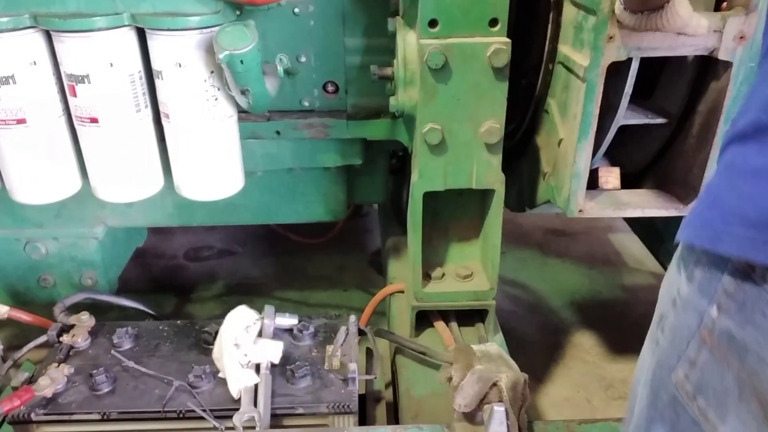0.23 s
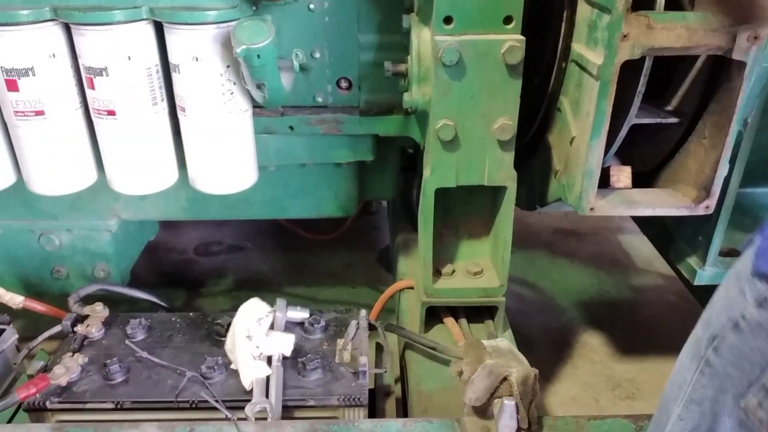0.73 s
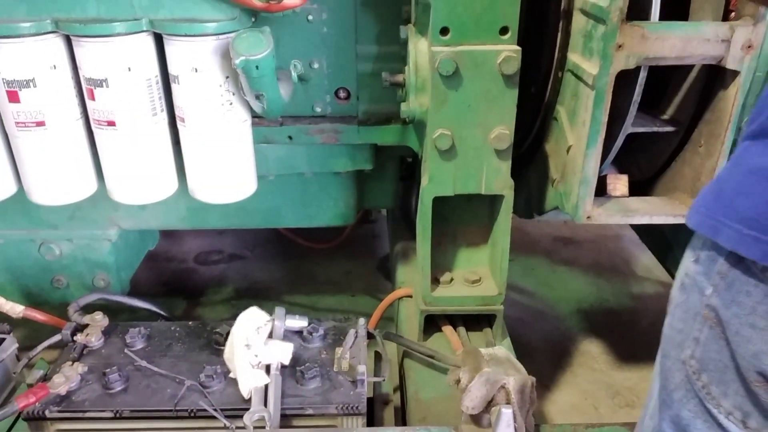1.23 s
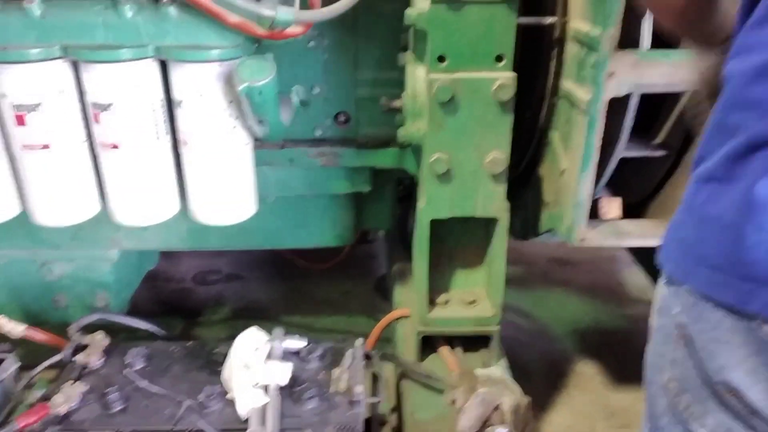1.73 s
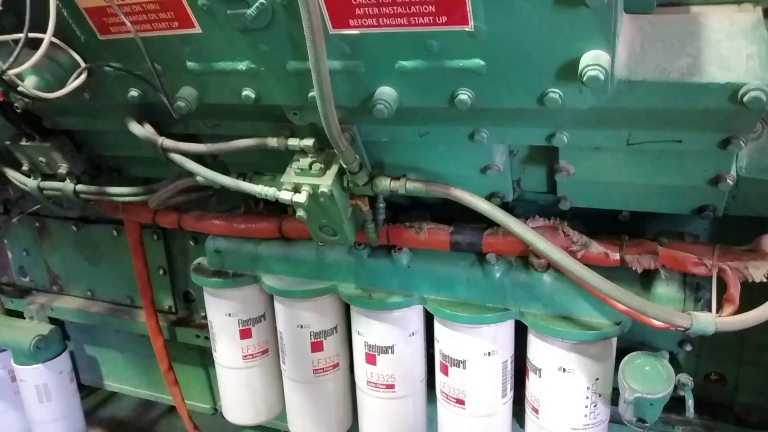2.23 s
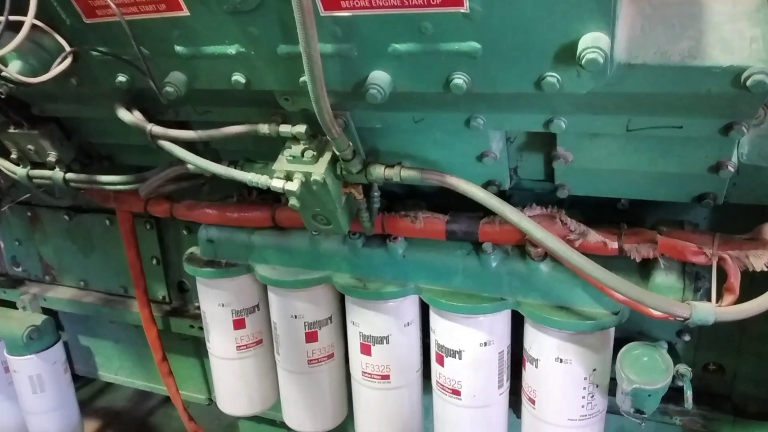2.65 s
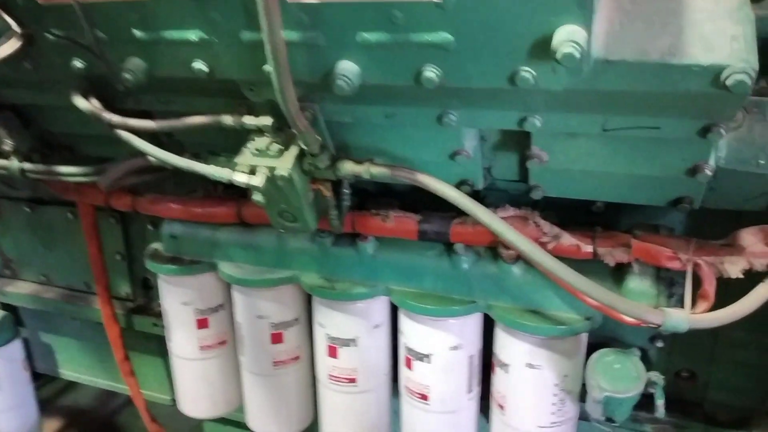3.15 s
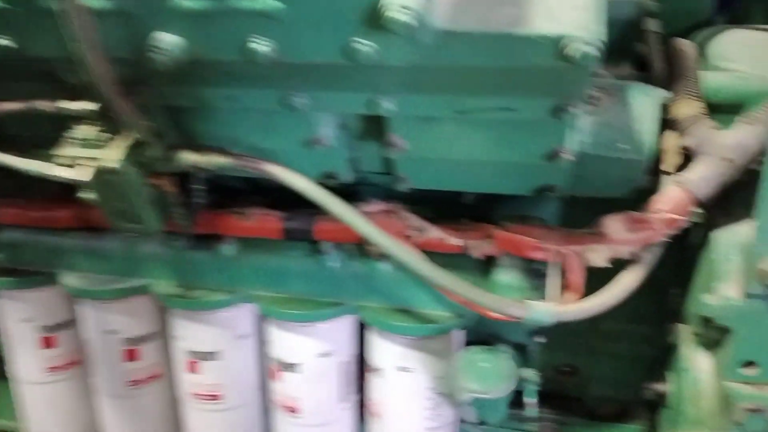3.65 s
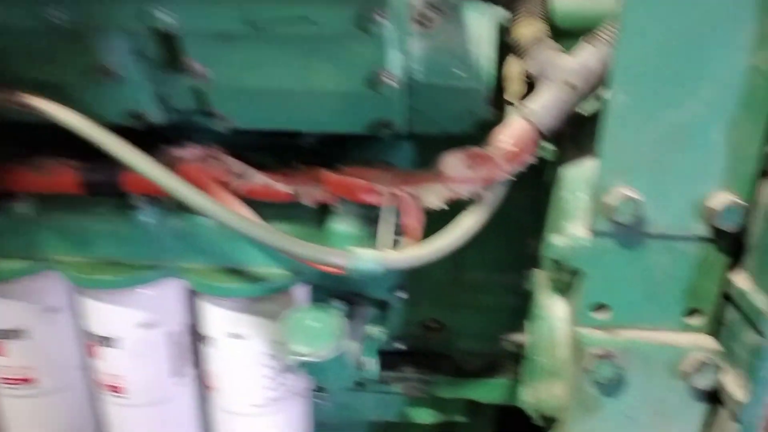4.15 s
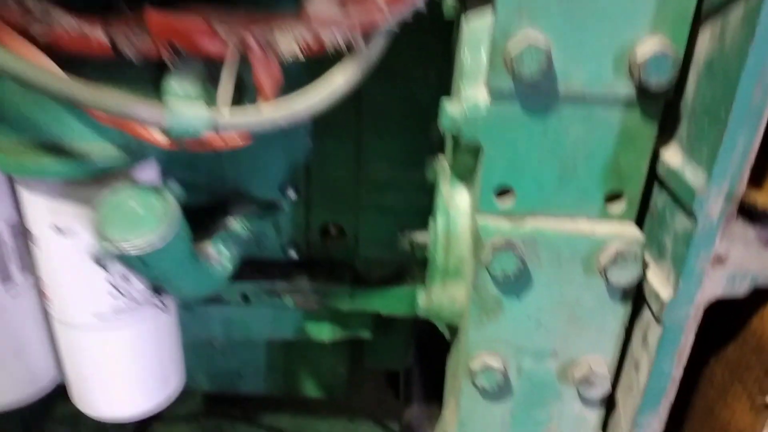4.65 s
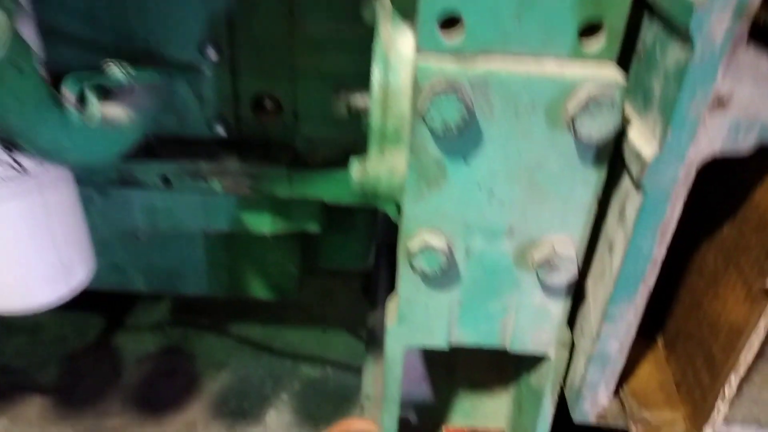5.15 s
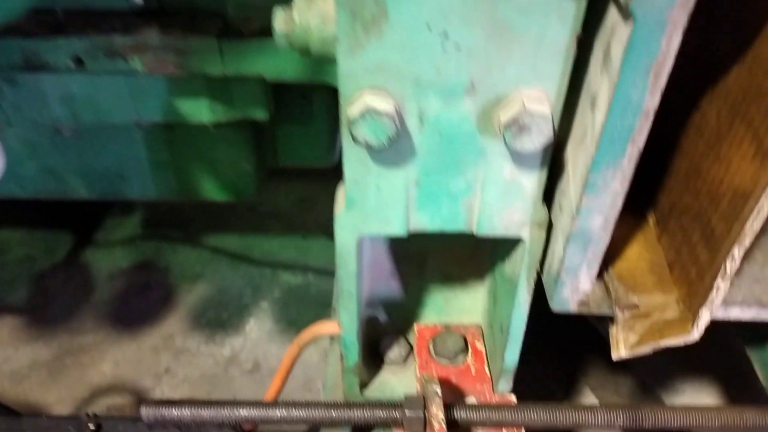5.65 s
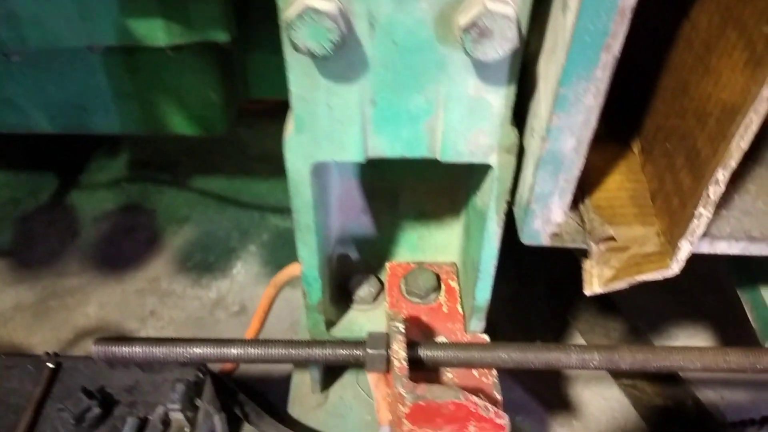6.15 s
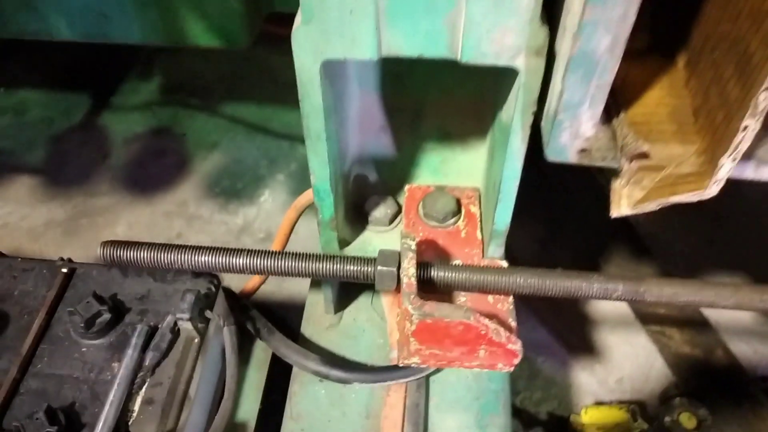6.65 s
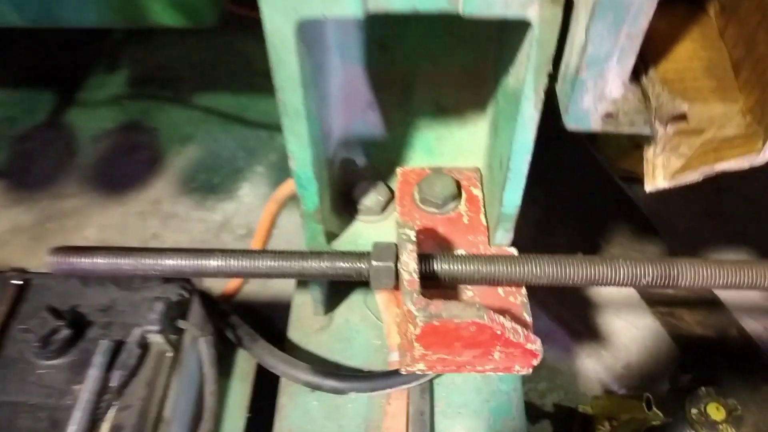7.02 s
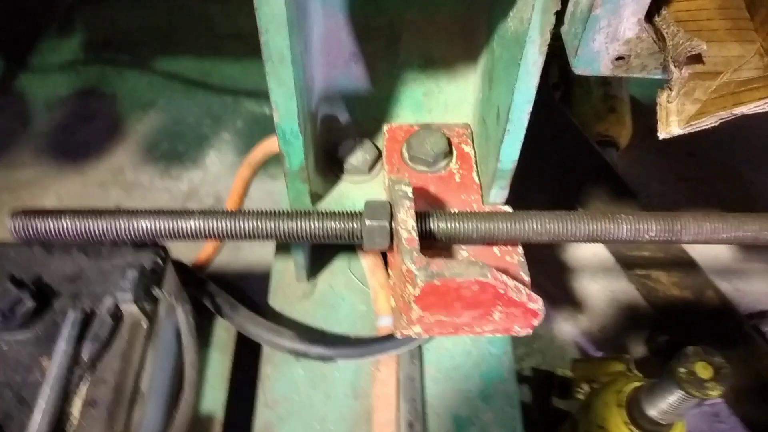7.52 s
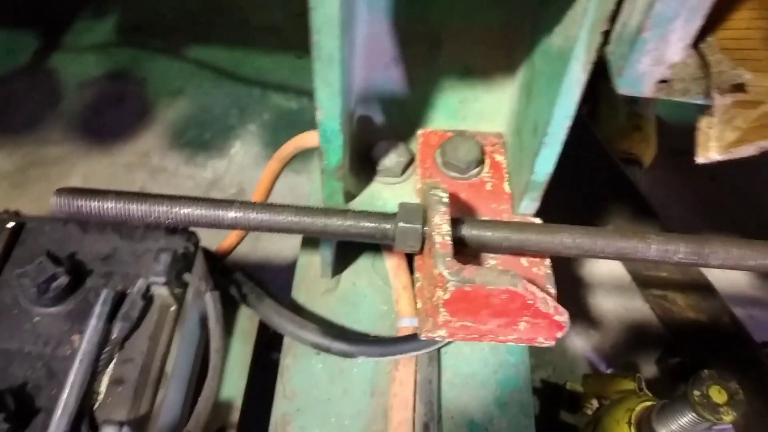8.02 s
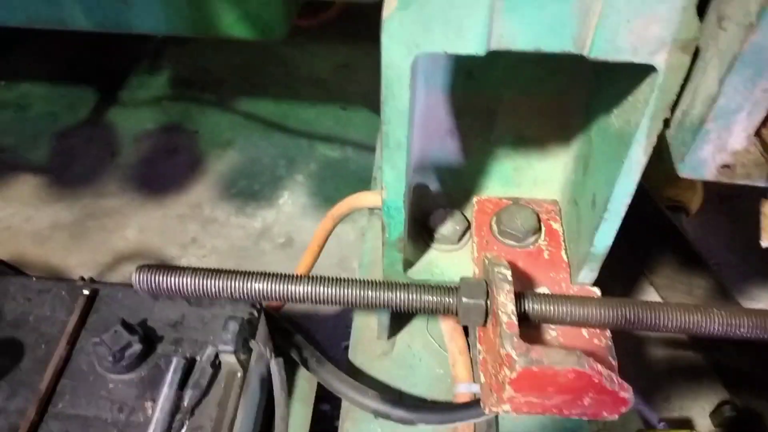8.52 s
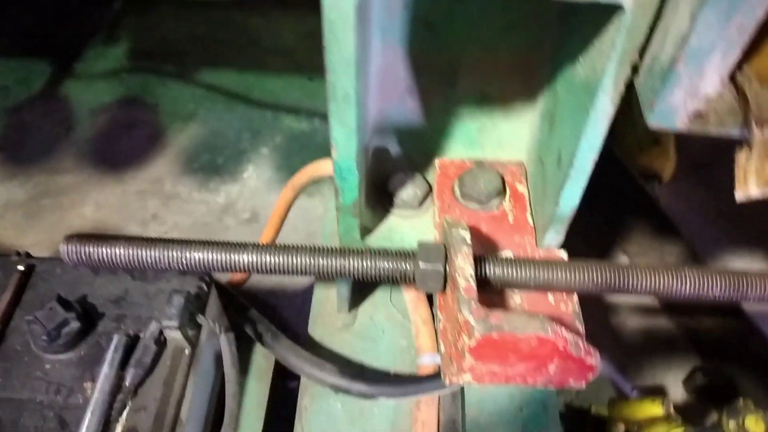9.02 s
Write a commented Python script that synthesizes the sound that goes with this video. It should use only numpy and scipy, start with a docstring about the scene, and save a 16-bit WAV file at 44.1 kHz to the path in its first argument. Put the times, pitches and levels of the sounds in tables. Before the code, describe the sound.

Loud, constant diesel engine clatter with drone, thin turbo whistle and air rush, interrupted once by about a third of a second of silence.

```python
"""A sixteen-cylinder diesel generator knocks at 1500 rpm in a hard plant room, heard by a phone carried along it.
Impulses at fixed crank angles, convolved with decaying noise, are the knocks and their reverberation.
Crank-locked sines are the drone and gear whine, a wandering sine and octave the turbocharger's whistle.
Decaying sines are the throbbing firings, rattles, short rings and clinks; shaped noise is the rush of air.
The phone's input is overloaded; once the sound stops, stays silent and fades back in."""
import sys
import numpy as np
from scipy import signal
from scipy.fft import rfft, irfft, next_fast_len
from scipy.io import wavfile
from scipy.ndimage import uniform_filter1d

SR = 44100
rng = np.random.default_rng(int(sys.argv[2]) if len(sys.argv) > 2 else 0)


def transcribe(signal):
    """Save signal, clipped to [-1, 1], as a 16-bit WAV file at the path in sys.argv[1]."""
    frames = np.atleast_2d(signal).T
    limited = np.clip(frames, -1, 1)
    pcm = np.round(limited * 32767).astype(np.int16)
    wavfile.write(sys.argv[1], SR, pcm)


N = 409248
TIME = np.arange(N) / SR  # s

# All source levels are stated ahead of the phone's input gain.
CYCLE_HZ = 12.498  # engine cycles per second, two crank turns each
FIRINGS_PER_CYCLE, FAN_MULTIPLE, GEAR_MULTIPLE = 16, 30, 260  # multiples of the engine cycle
# Relative spectrum of the knocks: [f/Hz, spectral level/dB]
KNOCK_SPECTRUM = [(20, -41), (45, -26.5), (65, -12.5), (90, -8.5), (130, -5), (190, 0.5), (300, -12),
                  (500, -14), (800, -12.5), (1150, -17), (1700, -13), (2800, -23.5), (5000, -28),
                  (12000, -28.5)]
ROOM_T60_S = 0.43
# Resonances and hollows of the engine covers: [f/Hz, width/Hz, gain/dB]
CASING_MODES = [(1490, 51, 2.5), (1920, 120, 1), (2060, 100, -2.5), (2210, 210, 0.5), (3250, 260, 1.5),
                (3920, 390, -1.3), (4260, 250, 1)]
# Low room resonances excited by uneven firings: [t/s, length/s, f/Hz, level/dB]
THROBS = [(4.3, 0.39, 140, -19), (5.1, 0.52, 143, -21), (5.877, 0.19, 168, -13.5), (5.3, .6, 245, -21.5),
          (6.95, 0.36, 215, -17), (8.15, 0.29, 154, -19), (3.2, .7, 265, -22.5)]
THROB_T60_S, THROB_SCATTER_DB = .06, 7

# Crank-locked tones (16 firing, 30 fan, 37 casing, 55 gears, the rest the block):
# [multiple of the engine cycle, level beside the filters/dB, level by the fan end/dB]
CRANK_TONES = [(6, -30, -29), (8, -29, -30), (9, -35, -22), (11, -32, -24), (13, -31, -30), (14, -36, -30),
               (16, -29.5, -25.5), (18, -36, -26), (22, -30, -25.5), (27, -37, -33), (28, -36, -31),
               (30, -18, -17.5), (33, -29, -35), (37, -28, -31), (44, -33, -34), (55, -33, -34),
               (56, -39, -38), (63, -33, -34), (64, -38, -34), (74, -35, -37), (120, -37, -35),
               (136, -40, -45), (150, -39, -39)]
# Standing waves crossed on the walk: [t/s, length/s, multiple of the engine cycle, gain at the centre/dB]
STANDING_WAVES = [(.35, .9, 16, 7), (1.5, .6, 16, 8), (6.7, .35, 16, 7), (.8, 2, 30, -2.5),
                  (4.2, .1, 30, -3), (4.85, .5, 30, -10), (1.1, 1.2, 37, -7), (3.25, .4, 37, 5.5),
                  (3.9, .3, 37, 9), (6.7, .6, 37, 4), (.6, .5, 44, 3), (3.5, .55, 44, 8.5),
                  (5.7, .4, 44, 7.5), (7.3, .6, 44, -7), (0, .3, 55, 8), (.9, .4, 55, 11),
                  (1.6, .7, 55, 12), (5.6, .5, 55, 8.5), (.9, 1.6, 56, 8), (.9, 1.8, 63, 5),
                  (5, 1.8, 63, -8), (2.7, .6, 16, -5), (1.2, 1.3, 6, 5), (6.9, .8, 6, 6),
                  (4.9, .35, 74, 8.5), (8.5, .7, 14, 6)]
FAN_WAVER, ENGINE_WAVER = 0.074, 0.21  # basic unsteadiness (0-1), greater where a tone sinks
# Gear whine beside the block: [t/s, length/s, level/dB]
GEAR_SWELLS = [(1.08, .36, -31.5), (1.68, .2, -33.5)]

# Blade rate of the turbocharger: [t/s, f/Hz]
BLADE_RATE = [(0, 4993), (1.5, 5000), (1.9, 4990), (2.5, 4940), (3.5, 4951), (6.2, 4949), (9.28, 4928)]
# Rise and fall of the whistle's fundamental along the walk: [t/s, length/s, gain at the centre/dB]
WHISTLE_SWELLS = [(.37, .12, 9), (1.797, 0.33, -4), (2.622, 0.17, 5), (3.15, .17, 6), (5.05, .4, 2.5),
                  (5.85, 0.16, -7), (6.65, 0.12, 9), (7.1, .3, -1), (8.05, .15, 1), (8.65, 0.36, -13)]
WHISTLE_DB = -32.5  # the same beside the filters and by the fan end
WHISTLE_OPENING_DB, WHISTLE_SETTLE_S = 8.5, .35  # initial excess and its time constant
WHISTLE_FADE_DB = 2.2  # depth of the irregular fading of the fundamental

# Rattling covers and pipes:
# [f/Hz, T60/s, level of a typical tap/dB, crank angle/cycles, t of passing/s, length of the pass/s]
RATTLING_PARTS = [(940, 0.076, -29, .3, 5, .5), (1497, 0.05, -20.5, .78, 8.3, 1.6),
                  (1044, 0.026, -27.5, 0.52, 7.4, 1.4), (1415, .035, -26.5, .28, .8, 1.3),
                  (1750, .04, -28, .54, .9, 1.3), (1886, 0.092, -25.5, .45, 4.5, .5),
                  (2110, 0.076, -25, 0.54, 7.1, 1.1), (2270, .045, -26, .1, 6.9, 0.65)]
RATTLE_SLACK, RATTLE_DETUNE = 0.0252, .018  # scatter of the moment (cycles) and of the note (share)
RATTLE_PASS_DB = 10.5  # rise as the phone passes a part
TAP_ATTACK_S = 0.0021
RINGS_PER_S, RING_DB, RING_T60_S = 70, -25.5, .04  # random short rings
RING_LOW_HZ, RING_HIGH_HZ = 1153, 2470  # range of notes
# Single louder clinks of loose metal: [t/s, f/Hz, level/dB]
CLINKS = [(1.515, 2370, -12), (1.672, 2020, -11), (7.675, 2070, -17), (7.720, 2080, -14),
          (7.818, 1970, -15), (8.383, 1450, -16), (8.556, 1880, -13)]
CLINK_T60_S = .09

# Relative spectrum of the air rush: [f/Hz, spectral level/dB]
RUSH_SPECTRUM = [(12, -20), (44, -9), (62, -4), (79, 7), (102, 0), (170, 0), (230, -5), (330, -7),
                 (500, -11), (800, -11), (1200, -15), (2100, -14), (3000, -21), (11000, -23),
                 (15000, -24.5)]
# Swells of air noise along the walk: [t/s, length/s, centre f/Hz, width/Hz, level/dB]
AIR_SWELLS = [(1.2, .5, 3260, 300, -31.5), (0.99, 1.3, 7850, 900, -28.5), (2.64, .14, 4000, 13600, -15),
              (2.4, .13, 2300, 900, -23), (7.62, .3, 6950, 894, -23.5), (8.3, 0.41, 7300, 700, -26.5),
              (.1, 0.46, 4400, 350, -28.5), (2.9, .8, 330, 120, -23)]

# Place of the phone: [t/s, nearness to the fan end (0-1)]
PHONE_PLACE = [(0, .55), (1.5, 0.53), (2.9, 0.3), (3.7, 0.25), (4.4, 0.58), (5.9, 0.95), (9.28, 0.93)]
# Upper edges of boom, body, clatter and hiss: [f/Hz]
BAND_EDGES_HZ = [240, 600, 3000, 22050]
# Boom, body, clatter and hiss: [level beside the filters/dB, level by the fan end/dB]
BAND_LEVELS = [(-16.5, -12.5), (-17.5, -17), (-13.5, -14.5), (-16, -16.5)]
PORT_GAP_M = 0.14
# Response of the left microphone port: [f/Hz, gain/dB]
LEFT_PORT = [(2500, -3.5), (3700, 0.5), (4400, 1.5), (6200, -1.5), (7800, 5.5), (9200, -2), (11000, -4.5),
             (12000, -3.5), (14000, -8), (15000, -11.5)]
# Response of the right microphone port: [f/Hz, gain/dB]
RIGHT_PORT = [(2500, -3.5), (3700, -1), (4400, -0.5), (6200, -3), (7800, -3.5), (9200, 1), (10700, 2.5),
              (12000, -1), (14000, -9), (15000, -7.5)]
# The sound stops, stays silent and fades back in: [t/s, gain (0-1)]
SILENCE_AND_RETURN = [(1.879, 1), (1.881, .05), (1.905, 0), (2.222, 0), (2.224, .08), (2.44, 1)]
TOP_HZ = 15250  # upper limit of the phone's sound


def knock_train(crank, count=64, scatter_db=4.0):
    """Periodic excitation: strokes recur at their own crank angles, slightly varied in strength each cycle."""
    angle = (np.arange(count) + rng.random(count)) / count
    sign = rng.choice([-1, 1], count)
    strength = sign * undb(3.6 * rng.standard_normal(count))
    cycles = np.arange(int(crank[-1]) + 1)[:, None]
    at = np.interp(cycles + angle, crank, np.arange(N), right=0).ravel()
    variation = undb(scatter_db * rng.standard_normal((len(cycles), count)))
    size = (strength * variation).ravel() * (at > 0)
    # Each impulse is shared between its two neighbouring samples.
    i, part = at.astype(int), at % 1
    early = np.bincount(i, size * (1 - part), N + 1)
    late = np.bincount(i + 1, size * part, N + 1)
    return (early + late)[:N]


def clatter(crank, count=22):
    """Reverberation: knocks convolve with decaying echoes, differing by place and blended along the walk."""
    t = TIME[:SR // 2]
    lead = int(round(SR * int(CYCLE_HZ / 2) / CYCLE_HZ))  # the room is already ringing at the start
    out = np.zeros((2, N))
    for k in range(count):
        knocks = knock_train(crank)
        running = np.r_[knocks[:lead], knocks]
        away = TIME / TIME[-1] * (count - 1) - k
        near = np.flatnonzero(abs(away) < 1)
        echoes = rng.standard_normal((2, len(t))) * decay(t, ROOM_T60_S)
        excitation = running[None, near[0]:near[-1] + lead + 1]
        heard = signal.fftconvolve(excitation, echoes, axes=1)
        out[:, near] += unit(heard[:, lead:lead + len(near)]) * np.cos(np.pi / 2 * away[near])
    return unit(colour(diffuse(out), KNOCK_SPECTRUM))


def casing(x):
    """Structural resonance: the covers favour some frequencies and swallow others."""
    def gain(hz):
        return undb(sum(db * np.exp(-2 * ((hz - centre) / width) ** 2) for centre, width, db in CASING_MODES))
    return filtered(x, gain)


def along_walk(x):
    """Distance balance: towards the fan end the boom grows while clatter and hiss recede."""
    out = 0
    for edge, (side_db, end_db) in zip(BAND_EDGES_HZ, BAND_LEVELS):
        band = filtered(x, lambda hz: 1 / (1 + (hz / edge) ** 8))
        x = x - band  # the remainder goes to the higher bands
        out = out + unit(band) * undb(by_place(side_db, end_db))
    return out


def throb(crank):
    """Modal excitation: uneven firings thump low room resonances, which swell as the phone passes."""
    at = np.flatnonzero(np.diff(np.floor(FIRINGS_PER_CYCLE * crank)))
    t = TIME[:SR // 4]
    out = 0
    for s, length, hz, db in THROBS:
        strength = undb(THROB_SCATTER_DB * np.minimum(rng.standard_normal(len(at)), 2))
        firings = np.bincount(at, strength - strength.mean(), N)  # only the unevenness excites the room
        mode = np.sin(2 * np.pi * hz * t) * decay(t, THROB_T60_S)
        boom = signal.fftconvolve(firings, mode)[:N]
        out = out + unit(boom) * undb(db) * swell(s, length)
    return out


def drone(crank):
    """Harmonic radiation: crank multiples swell, or sink and waver more, as the phone crosses standing waves."""
    out = 0
    for multiple, side_db, end_db in CRANK_TONES:
        waves_db = sum(db * swell(s, length) for s, length, which, db in STANDING_WAVES if which == multiple)
        waver = FAN_WAVER if multiple == FAN_MULTIPLE else ENGINE_WAVER
        waver = waver * undb(-np.clip(waves_db, -10, 0))
        out = out + undb(by_place(side_db, end_db) + waves_db) * tone(crank, multiple, waver)
    return out


def tone(crank, multiple, waver):
    """Interference: a crank-locked line whose level and phase waver in the room's standing waves."""
    phase = 2 * np.pi * (multiple * crank + rng.random()) + waver * walk(4)
    # radians; the left port hears the line later
    port_lag = np.array([[-1], [1]]) * min(multiple * CYCLE_HZ / 1600, .8)
    return np.sqrt(2) * (1 + waver * walk(4)) * np.sin(phase + port_lag)


def gears(crank, flicker=.7):
    """Tooth meshing: a thin, rough whine locked to the crank, heard only beside the block."""
    level = sum(undb(db) * swell(s, length) for s, length, db in GEAR_SWELLS)
    phase = 2 * np.pi * GEAR_MULTIPLE * crank
    ports = [unit((1 + flicker * walk(50)) * np.sin(phase + flicker * walk(40))) for _ in range(2)]
    return level * np.array(ports)


def turbo(wander_hz=4, octave_db=-6, flicker=1.1):
    """Blade passing: a whistle and its octave, made to flicker separately at each port by echoes."""
    hz, = curves(BLADE_RATE)
    phase = 2 * np.pi * np.cumsum(hz + wander_hz * walk(12)) / SR
    level_db = WHISTLE_DB + WHISTLE_OPENING_DB * np.exp(-TIME / WHISTLE_SETTLE_S)
    swells_db = sum(rise_db * swell(s, length) for s, length, rise_db in WHISTLE_SWELLS)
    swells = undb(swells_db + WHISTLE_FADE_DB * np.minimum(walk(9), 1))

    def partial(angle):
        direct = np.sin(angle) * (1 + flicker * walk(45))
        return unit(direct + flicker * walk(60) * np.cos(angle))

    ports = []
    for _ in range(2):
        fundamental = swells * partial(phase + walk(2))
        octave = undb(octave_db) * partial(2 * phase + walk(2.4))
        ports.append(fundamental + octave)
    return undb(level_db) * np.array(ports)


def rattle(crank, spread_db=1.5):
    """Impact excitation: loose covers and pipes ring once a cycle at their own note, angle and uneven force."""
    cycles = np.arange(int(crank[-1]) + 1)
    out = np.zeros((2, N))
    for hz, t60, db, angle, passed_s, pass_s in RATTLING_PARTS:
        heard_db = db + RATTLE_PASS_DB * swell(passed_s, pass_s)
        moments = cycles + angle + RATTLE_SLACK * rng.standard_normal(len(cycles))
        starts = np.interp(moments, crank, np.arange(N), left=0, right=0).astype(int)
        chances = rng.standard_normal((len(starts), 4))
        for start, (force, detune, *phases) in zip(starts, chances):
            if start:  # zero marks a tap outside the scene
                gain = undb(heard_db[start] + spread_db * min(force, 1))
                add(out, start, gain * tap(hz * (1 + RATTLE_DETUNE * detune), t60, np.array(phases)))
    return out


def short_rings(spread_db=6.0):
    """Random excitation: brief taps on varied notes roughen the clatter, their strength scattered but capped."""
    out = np.zeros((2, N))
    count = int(RINGS_PER_S * N / SR)
    for (moment, note, *phases), force in zip(rng.random((count, 4)), rng.standard_normal(count)):
        hz = RING_LOW_HZ * (RING_HIGH_HZ / RING_LOW_HZ) ** note
        gain = undb(RING_DB + spread_db * min(force, 1.5))
        add(out, int(moment * N), gain * tap(hz, RING_T60_S, np.array(phases) / 2))
    return out


def clinks():
    """Free vibration: now and then a loose part strikes harder and rings out of the clatter."""
    out = np.zeros((2, N))
    for (s, hz, db), phases in zip(CLINKS, rng.random((len(CLINKS), 2))):
        add(out, int(s * SR), undb(db) * tap(hz, CLINK_T60_S, phases / 4))
    return out


def tap(hz, t60, phases):
    """Damped oscillation: one short metallic ring, with its own phase (in turns) at each port."""
    t = TIME[:SR // 10]
    return np.sin(2 * np.pi * (hz * t + phases[:, None])) * decay(t, t60) * np.minimum(t / TAP_ATTACK_S, 1)


def rush(pulses, smoothing_s=0.0058, pulsing_db=.5, flutter_db=0.74):
    """Turbulence noise: cooling and intake air, its level pulsing slightly with the engine cycle."""
    pulsing = signal.lfilter([1], [1, -np.exp(-1 / (smoothing_s * SR))], abs(pulses))
    swell_db = pulsing_db * unit(pulsing - pulsing.mean()) + flutter_db * walk(14)
    air = rng.standard_normal((2, N)) * undb(swell_db)
    return unit(colour(diffuse(air), RUSH_SPECTRUM))


def air_swells():
    """Band-limited noise: bands of air noise swell and fade as the phone passes."""
    out = 0
    for s, length, centre_hz, width_hz, db in AIR_SWELLS:
        noise = rng.standard_normal((2, N))
        band = filtered(noise, lambda hz: 1 / (1 + (2 * (hz - centre_hz) / width_hz) ** 2))
        out = out + unit(band) * undb(db) * swell(s, length)
    return out


def diffuse(pair):
    """Diffuse-field coherence: sound from all sides is alike in the bass, nearly unrelated in the treble."""
    def likeness(hz):
        return .985 * np.sinc(2 * hz * PORT_GAP_M / 343)  # speed of sound 343 m/s
    mid, side = filtered(pair, lambda hz: np.sqrt(1 + np.array([likeness(hz), -likeness(hz)])))
    return np.array([mid + side, mid - side])


def by_place(side_db, end_db):
    """Position dependence: level in dB on the way from the filters to the fan end."""
    fan_end, = curves(PHONE_PLACE)
    return side_db + (end_db - side_db) * fan_end


def swell(s, length):
    """Local maximum: a bell-shaped rise and fall around a moment."""
    return np.exp(-2 * ((TIME - s) / length) ** 2)


def decay(t, t60):
    """Exponential damping: a fall of 60 dB in the time t60."""
    return np.exp(-np.log(1000) * t / t60)


def add(out, start, sound):
    """Superposition: mix a sound in from a given sample on."""
    out[:, start:start + sound.shape[1]] += sound[:, :N - start]


def undb(db):
    """Level to amplitude: decibels to gain."""
    return 10 ** (np.asarray(db) / 20)


def unit(x):
    """Normalisation: scale to rms 1."""
    return x / np.sqrt(np.mean(x ** 2))


def curves(rows):
    """Linear interpolation: each column of a table as a control over time."""
    s, *columns = np.transpose(rows)
    return [np.interp(TIME, s, c) for c in columns]


def walk(rate):
    """Random modulation: smoothed chance values, about rate new ones per second, with rms 1."""
    k = max(int(SR / rate), 1)
    steps = np.repeat(rng.standard_normal(N // k + 1), k)
    return unit(uniform_filter1d(steps, k)[:N])


def filtered(x, gain):
    """Linear filtering: apply a gain given as a function of frequency."""
    size = next_fast_len(x.shape[-1], real=True)
    hz = np.maximum(np.arange(size // 2 + 1) * SR / size, 1)
    return irfft(rfft(x, size) * gain(hz), size)[..., :x.shape[-1]]


def colour(x, points):
    """Spectral shaping: gain in dB interpolated over the logarithm of frequency."""
    f, db = np.transpose(points)
    return filtered(x, lambda hz: undb(np.interp(np.log(hz), np.log(f), db)))


def scene(rush_db=4.0):
    """Synchronism: the governor holds the speed almost exactly, and one crank drives all crank-locked sounds."""
    crank = np.cumsum(CYCLE_HZ * (1 + .0003 * walk(3))) / SR  # engine cycles
    air = rush(knock_train(crank))  # pulses have strokes of their own
    machine = clatter(crank) + undb(rush_db) * air  # rush level relative to the knocks
    tones = drone(crank) + gears(crank) + turbo()
    metal = rattle(crank) + short_rings() + clinks()
    return along_walk(casing(machine)) + throb(crank) + tones + metal + air_swells()


def record(dry, drive_db=4.0, ceiling=0.93):
    """Saturation: coloured by the ports, peaks round in the overloaded input; once the sound stops and returns."""
    ports = np.array([colour(dry[0], LEFT_PORT), colour(dry[1], RIGHT_PORT)]) * undb(drive_db)
    rounded = ports / (1 + (ports / ceiling) ** 4) ** (1 / 4)
    gain, = curves(SILENCE_AND_RETURN)
    low_pass = signal.ellip(10, .2, 70, TOP_HZ, fs=SR, output="sos")
    return signal.sosfilt(low_pass, rounded * gain)


dry = scene()
out = record(dry)
transcribe(out)
```